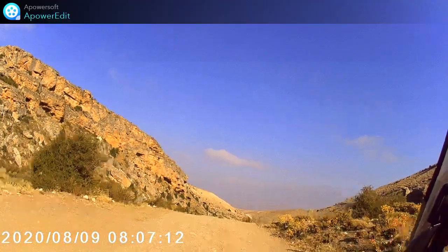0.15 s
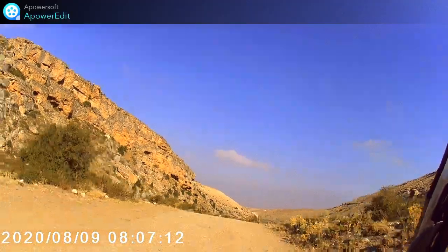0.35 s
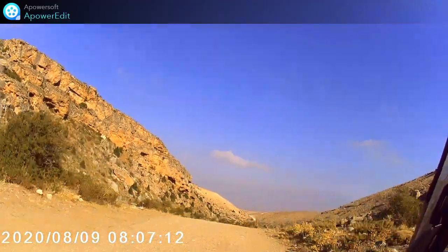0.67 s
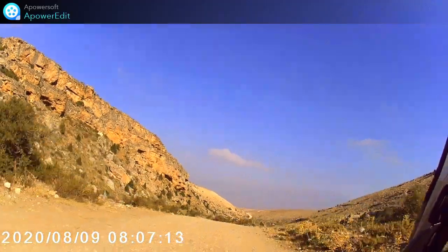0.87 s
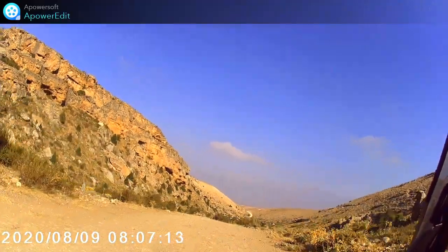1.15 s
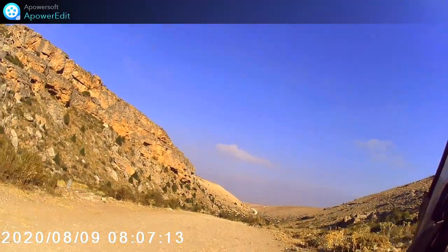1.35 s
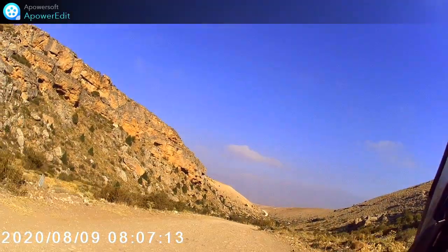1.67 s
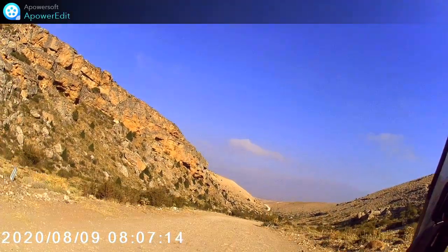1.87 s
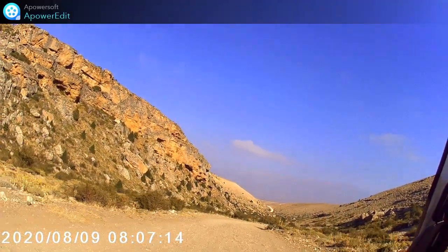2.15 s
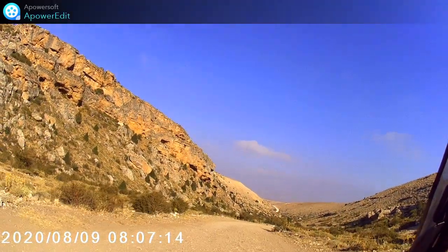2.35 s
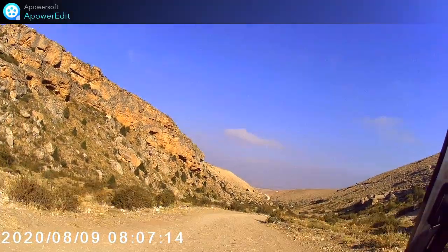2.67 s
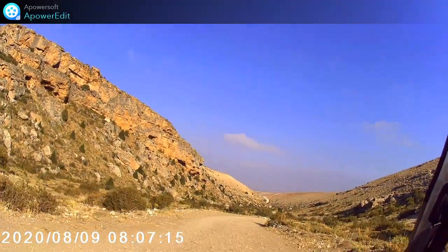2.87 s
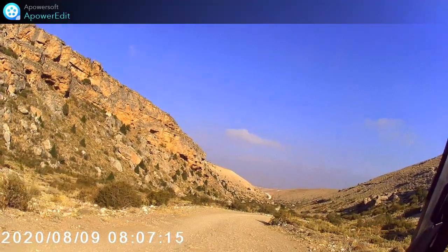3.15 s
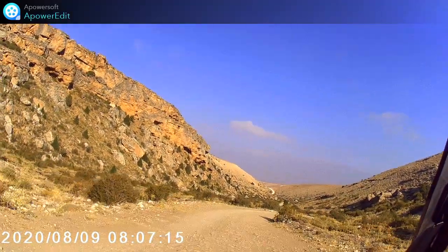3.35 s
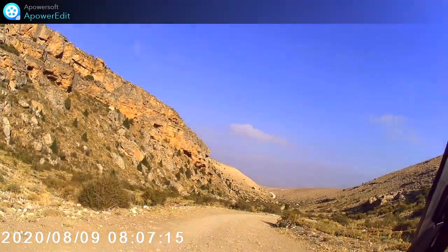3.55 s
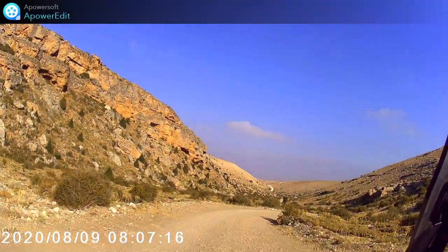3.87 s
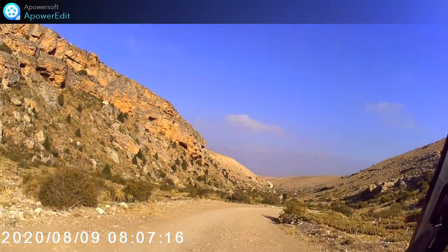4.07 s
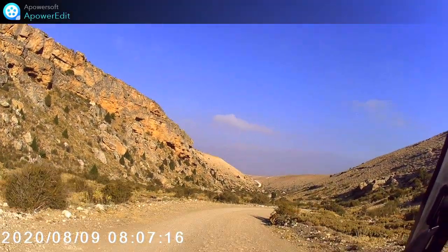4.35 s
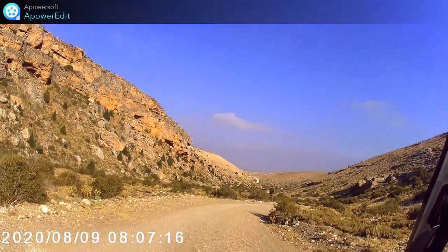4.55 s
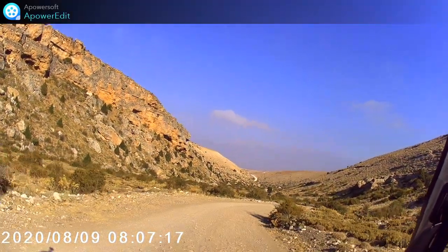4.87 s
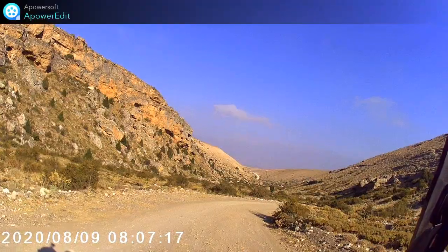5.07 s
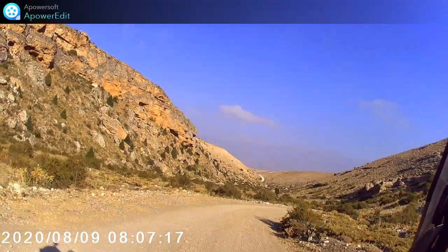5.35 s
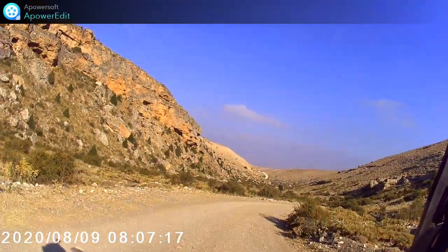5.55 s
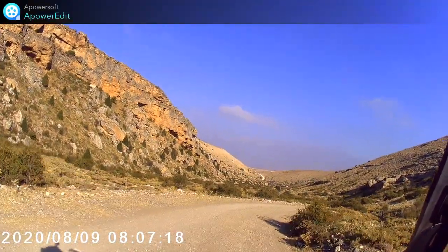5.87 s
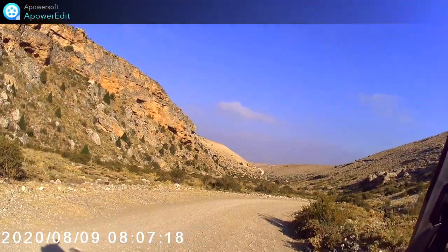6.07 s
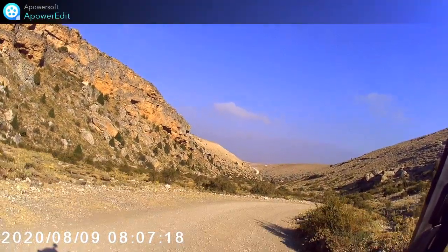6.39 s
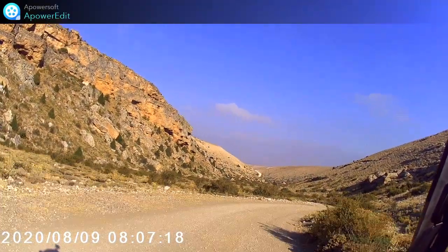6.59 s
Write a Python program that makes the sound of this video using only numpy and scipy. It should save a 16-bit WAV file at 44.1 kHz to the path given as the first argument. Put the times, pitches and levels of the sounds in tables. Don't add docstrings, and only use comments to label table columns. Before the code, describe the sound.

A motorcycle rolls slowly down a gravel track outdoors. Dense, irregular hard ticks from a chattering camera housing dominate, right beside the microphone. Below them the exhaust thuds in uneven low pairs, with faint gear whine and a dull wind and tyre rush. The engine eases after about a second and the ticks thin into clusters. Stones crunch against the frame, and a loose bracket rattles near the end.

```python
import sys
import numpy as np
from scipy import signal
from scipy.io import wavfile
from scipy.ndimage import uniform_filter1d

SR = 44100
rng = np.random.default_rng(int(sys.argv[2]) if len(sys.argv) > 2 else 0)


def to_linear_factor(level_db):
    exponent = np.asarray(level_db, float) / 20
    return 10 ** exponent


def waveform_to_disk(signal):
    frames = np.transpose(np.atleast_2d(signal))
    scaled = np.clip(frames, -1, 1) * 32767
    samples = np.round(scaled).astype(np.int16)
    wavfile.write(sys.argv[1], SR, samples)


N = 296352


def rms_one(x):
    return x / np.sqrt(np.mean(x ** 2) + 1e-20)


def in_time(rows):
    s, *columns = np.transpose(rows)
    return [np.interp(np.arange(N) / SR, s, column) for column in columns]


def drift(rate_hz):
    r = np.exp(-80 * np.pi * rate_hz / SR)
    white = rng.standard_normal(N // 40 + 2002)
    slow = signal.lfilter([1], [1, -2 * r, r * r], white)[2000:]
    return np.interp(np.arange(N) / 40, np.arange(len(slow)), rms_one(slow))


def bandpass(x, low_hz, high_hz, order=2):
    return signal.sosfilt(signal.butter(order, [low_hz, high_hz], "band", fs=SR, output="sos"), x)


def ring(clicks, hz, t60):
    r, w = to_linear_factor(-60 / (t60 * SR)), 2 * np.pi * hz / SR
    return signal.lfilter([0, np.sin(w)], [1, -2 * r * np.cos(w), r * r], clicks + 1e-18)


def train(s, sizes):
    out = np.zeros(N)
    np.add.at(out, np.clip((np.asarray(s) * SR).astype(int), 0, N - 1), sizes)
    return out


def fading(clicks, ms):
    return signal.lfilter([1], [1, -np.exp(-1000 / (ms * SR))], np.abs(clicks) + 1e-18)


# time in seconds, speed in cycles per second.
ENGINE_SPEED = [(0.0, 12.547), (0.5, 12.956), (0.95, 12.912), (1.2, 11.924), (1.45, 12.312), (1.7, 12.876),
                (2.0, 10.9), (2.3, 11.351), (2.7, 11.229), (3.1, 11.05), (3.5, 10.872), (3.9, 11.025),
                (4.3, 9.971), (4.7, 10.062), (5.2, 10.66), (5.7, 9.621), (6.2, 10.155), (6.72, 9.637)]


def cycles():
    start_cycle, slack_from_s, snatch_cycles, snatch_hz = -.636, 1.0, .014, 5
    slack = np.clip(np.arange(N) / SR / slack_from_s, 0, 1) ** 4
    turned = np.cumsum(in_time(ENGINE_SPEED)[0]) / SR
    return start_cycle + turned + snatch_cycles * slack * drift(snatch_hz)


# frequency in Hz, level in dB, 60 dB decay time in seconds.
PIPE_MODES = [
    (54.4, -13.5, 0.3),
    (92.8, -0.5, 0.12),
    (140.6, -15, 0.12),
]


def exhaust(turns, level_db):
    second_cylinder, second_db = .357, 2.5
    whole = np.arange(-1, np.ceil(turns[-1]))
    fired = np.sort(np.r_[whole, whole + second_cylinder])
    fired = fired[(fired > turns[0]) & (fired < turns[-1])]
    chance = rng.standard_normal((len(fired), 1 + len(PIPE_MODES)))
    s = np.interp(fired, turns, np.arange(N) / SR) - .0095 + .0003 * chance[:, 0]
    push_db = second_db * (fired % 1 > 0) + 1.5 * chance[:, 1:].T
    out = np.zeros(N)
    for (hz, db, t60), mode_push_db in zip(PIPE_MODES, push_db):
        puffs = train(s, -to_linear_factor(mode_push_db))
        out += to_linear_factor(db) * ring(puffs, hz, t60)
    return to_linear_factor(level_db + 1.0) * rms_one(bandpass(out, 46, 170, order=3))


# time in seconds, pitch in Hz, level in dB.
GEAR_WHINE = [
    (0, 1198, -38.5),
    (.5, 1233, -40),
    (.92, 1251, -39),
    (1.1, 1150, -41),
    (1.5, 1080, -43),
    (2.1, 1047, -46),
    (3, 1008, -45),
    (4.5, 938, -50),
    (6.72, 935, -48),
]


def gears(turns):
    ripple_share, ripple_at_cycle, ripple_db = .06, .15, 3
    hz, level_db = in_time(GEAR_WHINE)
    angle = 2 * np.pi * (turns - ripple_at_cycle)
    smear_hz = 45 * drift(60) + 15 * drift(5)
    mesh_hz = hz * (1 + ripple_share * np.sin(angle)) + smear_hz
    tone = np.sin(2 * np.pi * np.cumsum(mesh_hz) / SR)
    return to_linear_factor(level_db - 1.5 + ripple_db * np.cos(angle) + 2.0 * drift(14)) * tone


# start in seconds, length in seconds, chatter level in dB.
ROUGH_GROUND = [(0.0, 0.359, -25), (0.387, 0.364, -21), (0.76, 0.289, -27.5), (1.099, 0.11, -19),
                (1.239, 0.12, -27.5), (1.353, 0.064, -21), (1.547, 0.145, -19.5), (1.822, 0.264, -27.5),
                (2.19, 0.11, -30), (2.294, 0.034, -14), (2.364, 0.076, -26), (2.666, 0.075, -21.5),
                (2.779, 0.084, -22.5), (2.967, 0.19, -27.5), (3.215, 0.14, -33), (3.382, 0.13, -26.5),
                (3.56, 0.083, -23.5), (3.671, 0.04, -26.5), (3.756, 0.085, -23.5), (3.883, 0.195, -28.5),
                (4.163, 0.13, -26), (4.345, 0.087, -23), (4.478, 0.09, -25), (4.569, 0.14, -42.5),
                (4.639, 0.519, -27), (5.241, 0.299, -21.5), (5.667, 0.028, -39), (5.837, 0.349, -27),
                (6.246, 0.083, -24.5), (6.394, 0.22, -28.5)]


def shaking():
    smooth_db, edge_s = -34.0, 0.004
    level_db = np.full(N, smooth_db)
    for s, length, db in ROUGH_GROUND:
        level_db[int(s * SR):int((s + length) * SR)] = db
    return uniform_filter1d(level_db, int(edge_s * SR), mode="nearest")


# frequency in Hz, width in Hz, level in dB, spread between ticks in dB.
SHELL_MODES = [
    (1350, 1400, -27, 5.5),
    (2350, 1350, 4, 8),
    (3964, 580, 4.5, 7),
    (4664, 560, 5.5, -7.5),
    (5950, 330, -3.5, 5.5),
    (6400, 230, -13.5, 1),
    (4900, 1330, -17, 9),
]


def housing(s, peak_db, buzz_db, buzz_ms):
    t = np.arange(400) / SR
    drive = to_linear_factor(buzz_db) * np.exp(-1000 * t / buzz_ms) * rng.standard_normal((len(s), 400))
    drive[:, 0] = 1
    shares = np.clip(rng.standard_normal((len(s), len(SHELL_MODES) + 1)), -2, 1.5)
    parts = []
    for k, (hz, width_hz, db, spread_db) in enumerate(SHELL_MODES):
        share_db = np.minimum(spread_db, 2.5) * shares[:, [k]]
        parts.append(to_linear_factor(db + share_db) * ring(drive, hz, 2.2 / width_hz))
    bright = np.abs(sum(parts[2:])).max(axis=1)
    ticks = sum(parts) * (to_linear_factor(peak_db) * np.sign(shares[:, -1]) / bright)[:, None]
    out = np.zeros(N + 400)
    for at, tick in zip(np.clip(s * SR, 0, N - 1).astype(int), ticks):
        out[at:at + 400] += tick
    return out[:N]


# time in seconds, peak in dB.
HARD_SLAMS = [(.077, -9), (.2002, -6), (.4043, -9), (.4904, -8), (.7014, -8), (.7219, -9), (.867, -7),
              (.9388, -8), (.9899, -10), (1.1722, -8), (1.1985, -9), (1.2963, -8), (1.5572, -8),
              (1.5706, -9), (1.6367, -7), (1.9354, -9), (2.0256, -8), (2.3068, -9), (2.72, -8),
              (3.1903, -9), (3.8261, -9), (4.3815, -8), (5.1676, -9), (5.2595, -9), (5.4654, -9),
              (5.7818, -9), (5.9053, -9), (5.9234, -8), (5.9773, -9), (6.4437, -7)]
# time in seconds, peak in dB.
CAMERA_LANDINGS = [(0.1551, -6.5), (0.3708, -8.5), (0.7988, -17), (0.9237, -7.5), (1.1017, -6),
                   (2.1224, -24), (2.1908, -16), (2.5335, -10.5), (2.9922, -11), (3.178, -3.5), (3.25, -15),
                   (3.3423, -7.5), (3.5029, -7.5), (3.57, -5), (3.69, -7.5), (3.7478, -29), (3.7892, -14),
                   (3.925, -7), (4.2257, -23), (4.2731, -8.5), (4.4908, -5.5), (4.5413, -6),
                   (4.6487, -17.5), (4.6816, -14), (5.1159, -15), (5.8376, -25), (5.8779, -12.5),
                   (6.077, -17), (6.566, -11.5), (6.6339, -12)]
# frequency in Hz, width in Hz, depth from 0 to 1.
PORT_NOTCHES = [
    (3110, 210, 1),
    (5960, 73, 0.1),
]


def chatter():
    flight_s, mean_wait_s = .0023, .0028
    s, db = np.transpose(HARD_SLAMS + [(s + .001, db) for s, db in CAMERA_LANDINGS])
    born = np.cumsum(flight_s + rng.exponential(mean_wait_s, 1800))
    luck = np.clip(rng.standard_normal(1800), -3, 1.7)
    free = (np.abs(born[:, None] - s).min(axis=1) > flight_s) & (born < N / SR)
    born, luck = born[free], luck[free]
    clumped_db = shaking() + 2.0 * drift(50)
    tick_db = clumped_db[(born * SR).astype(int)] + 9.5 + 7 * luck
    to_landing_s = np.transpose(CAMERA_LANDINGS)[0] - born[:, None]
    airborne = ((to_landing_s > 0) & (to_landing_s < .012)).any(axis=1)
    tick_db = np.minimum(tick_db - 14 * airborne, -8.0)
    clean = luck > -.3
    clean_s, clean_db = np.r_[s - .00015, born[clean]], np.r_[db + 1.3, tick_db[clean]]
    out = housing(clean_s, clean_db, buzz_db=-24, buzz_ms=1.0)
    out = out + housing(born[~clean], tick_db[~clean], buzz_db=-14, buzz_ms=.9)
    for hz, width_hz, depth in PORT_NOTCHES:
        out = out - depth * signal.lfilter(*signal.iirpeak(hz, hz / width_hz, fs=SR), out)
    return out


# time in seconds, peak in dB, centre in Hz, length in ms.
STONE_HITS = [(0.489, -6, 1690, 9.3), (0.863, -4, 1250, 1.7), (0.987, -12, 530, 5.2), (1.102, 0, 2100, 5.6),
              (1.143, 0.5, 2060, 3.1), (1.404, -10.5, 605, 11), (1.545, -7, 1070, 3.1),
              (1.551, -5, 460, 12), (1.664, -12, 515, 9.8), (1.973, -4.5, 625, 4.4), (2.895, -7.5, 301, 6),
              (3.569, -7, 1327, 2), (3.896, -0.5, 2290, 2.7), (3.936, -2, 1100, 2.7), (4.5, -7, 2043, 4.6),
              (4.68, -9, 1690, 3.9), (4.938, -14, 1420, 23), (5.167, -15, 311, 3.5),
              (5.374, -12, 1700, 4.4), (5.454, -1, 1490, 5.5), (5.643, -10, 2000, 7),
              (5.707, -13.5, 533, 11), (5.71, -3, 2100, 3.5), (5.804, -7.5, 659, 3.6), (5.998, -3, 675, 4),
              (6.044, -4, 490, 3.9), (6.33, -4, 525, 4.5)]


def stones():
    out, t = np.zeros(N + 2000), np.arange(2000) / SR
    for s, db, hz, ms in STONE_HITS:
        crunch = rms_one(bandpass(rng.standard_normal(2000), .35 * hz, 2.2 * hz))
        envelope = (1 - np.exp(-t / 0.0011)) * np.exp(-1000 * t / ms)
        out[int(s * SR):][:2000] += to_linear_factor(db - 12.5) * crunch * envelope
    return out[:N]


# time in seconds, peak in dB.
BRACKET_BLOWS = [(5.2565, -23), (5.3138, -19), (5.3672, -12), (5.4181, -18), (5.4415, -19), (5.4994, -20),
                 (5.5588, -12.5), (5.5832, -23), (5.7094, -15), (5.7518, -26), (5.7808, -22), (5.8007, -28),
                 (5.888, -21), (5.9429, -26), (5.9748, -21), (6.331, -19)]
# frequency in Hz, level in dB, 60 dB decay time in seconds.
BRACKET_MODES = [
    (1567, -1.5, 0.01),
    (2430, -5.5, 0.007),
    (713, -11, 0.0082),
]


def bracket():
    s, db = np.transpose(BRACKET_BLOWS)
    blows = train(s, to_linear_factor(db + 2.5))
    grit = to_linear_factor(-15) * fading(blows, 2.5) * rng.standard_normal(N)
    swell = np.hanning(180) / 90
    out = np.zeros(N)
    for hz, level_db, t60 in BRACKET_MODES:
        push = swell * np.cos(2 * np.pi * hz * np.arange(180) / SR)
        contact = signal.fftconvolve(blows, push)[:N]
        out += to_linear_factor(level_db) * ring(2 * contact + grit, hz, t60)
    return out


# frequency in Hz, level in dB per Hz.
RUSH_COLOUR = [(20, -21.5), (32, -13.5), (50, -7), (100, -5), (190, -0.5), (480, -4), (800, -8.5),
               (1400, -9), (2100, -12), (3000, -24.5), (4700, -20), (7000, -56.5)]


def rush(level_db):
    together, edges = drift(2.35), 24 * 2 ** np.arange(0, 8.6, .5)
    shake_db = shaking()
    shake_db = shake_db - shake_db.mean()
    white = rng.standard_normal((2, N))
    hz, db = np.transpose(RUSH_COLOUR)
    out = np.zeros(N)
    for k, (low, high) in enumerate(zip(edges, edges[1:])):
        colour_db = np.interp(np.log(low * high) / 2, np.log(hz), db)
        crunch_db = 0.5 * shake_db * np.clip(np.log2(low / 600) / 2, 0, 1)
        flicker_db = 1.0 * together + 1.6 * drift(36)
        out += to_linear_factor(colour_db + crunch_db + flicker_db) * bandpass(white[k % 2], low, high)
    return to_linear_factor(level_db + 2.5) * rms_one(out)


# time in seconds, level in dB.
ENGINE_LOAD = [(0.0, -31.5), (0.67, -26.5), (1.06, -31.5), (1.1, -26), (1.21, -38.5), (1.33, -31),
               (1.5, -31), (1.66, -28.5), (1.78, -39), (1.83, -28), (2.11, -35), (4.88, -33.5), (5.5, -33),
               (5.6, -32.5), (6.64, -33), (6.72, -47.5)]


def scene():
    turns, (load_db,) = cycles(), in_time(ENGINE_LOAD)
    ground_db = uniform_filter1d(shaking(), int(.15 * SR), mode="nearest")
    rush_db = -37 + 0.24 * (load_db - load_db.mean()) + 0.05 * (ground_db - ground_db.mean())
    ride = exhaust(turns, load_db) + gears(turns) + rush(rush_db)
    return (ride + chatter() + bracket() + stones())[None]


# time in seconds, peak in dB.
SPUTTER_SPECKS = [(0.0174, -49), (0.157, -33), (0.185, -40), (0.3414, -42), (0.4095, -33.5), (0.6614, -44),
                  (0.8715, -40), (1.0187, -32), (1.1516, -39), (1.3448, -50), (1.3876, -38), (1.6157, -41),
                  (1.9749, -40), (2.1251, -55), (2.8163, -48), (3.1567, -56), (3.1783, -43), (3.4368, -40),
                  (3.784, -52), (3.8279, -32), (4.0277, -42), (4.4188, -40), (4.5008, -33), (4.5206, -38),
                  (4.899, -41), (5.3014, -44), (5.433, -47), (5.9706, -40), (6.1429, -56), (6.307, -42)]


def sputter():
    specks_per_s, speck_db, spread_db = 79, -57, 2
    s, db = np.transpose(SPUTTER_SPECKS)
    shake_db = shaking()
    chance = rng.random(N)
    swarm_db = shake_db - shake_db.mean() + 4.0 * drift(3.0)
    born = chance < specks_per_s * to_linear_factor(swarm_db) / SR
    weak = born * to_linear_factor(speck_db + spread_db * np.minimum(rng.exponential(1, N), 3))
    specks = train(s + 0.00033, to_linear_factor(db + 9.5)) + weak
    hiss = fading(specks, 1.3) * rng.standard_normal(N)
    dull = signal.sosfilt(signal.butter(4, 7800, fs=SR, output="sos"), hiss)
    return signal.sosfilt(signal.butter(6, 7500, "high", fs=SR, output="sos"), dull)


def top_cut(x):
    return signal.sosfilt(signal.butter(12, 15800, fs=SR, output="sos"), x)


def record(dry):
    low_pass = signal.firwin(241, 7040, window=("kaiser", 8), fs=SR)
    cut = signal.fftconvolve(.9 * np.tanh(dry / .9), low_pass[None], "same")
    skirt = to_linear_factor(-30.5 + 9.4 * drift(14)) * bandpass(dry, 7550, 8050, order=3)
    offset = -.027
    return top_cut(cut + skirt + sputter() + offset)


dry = scene()
out = record(dry)
waveform_to_disk(out)
```